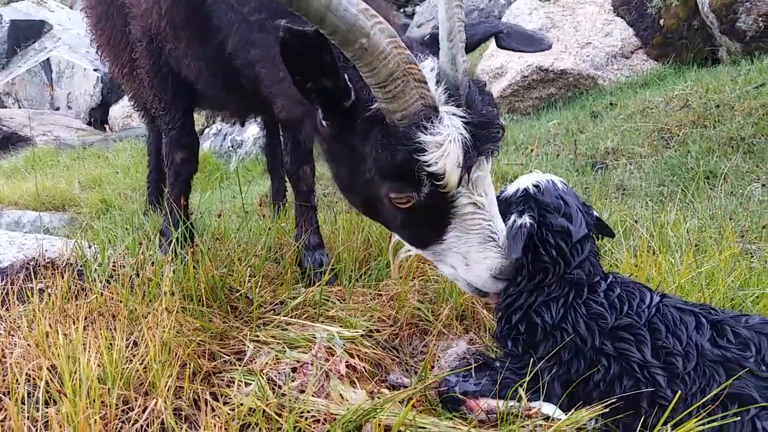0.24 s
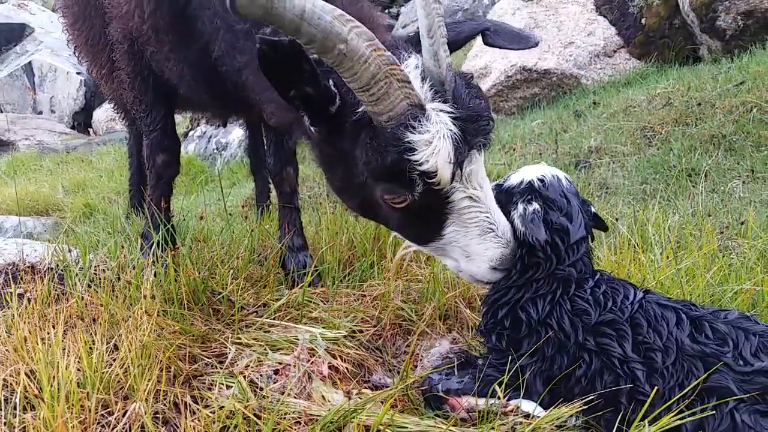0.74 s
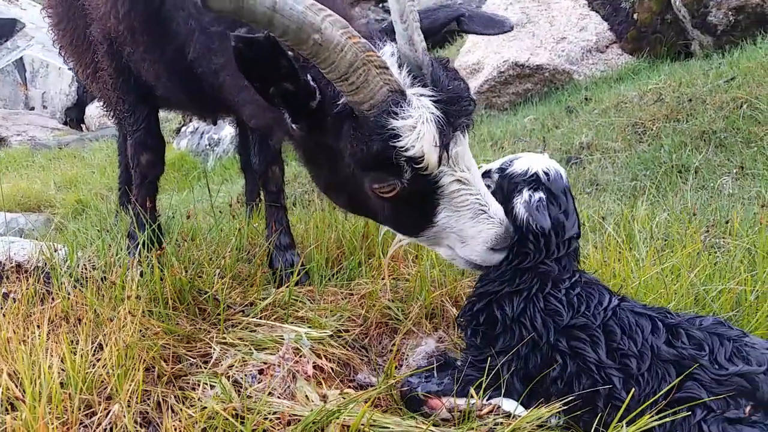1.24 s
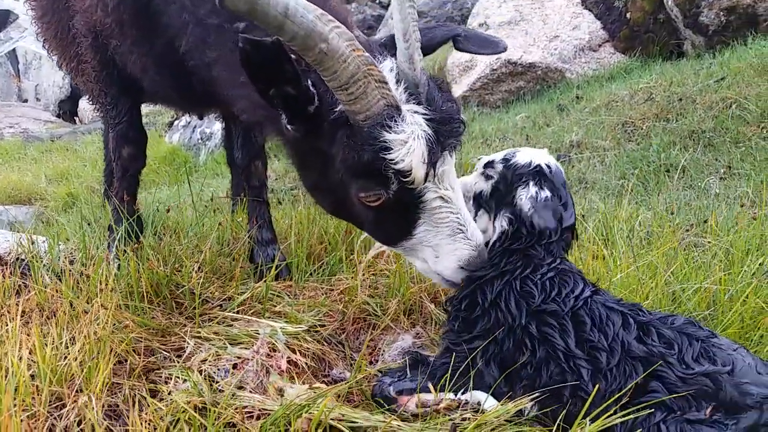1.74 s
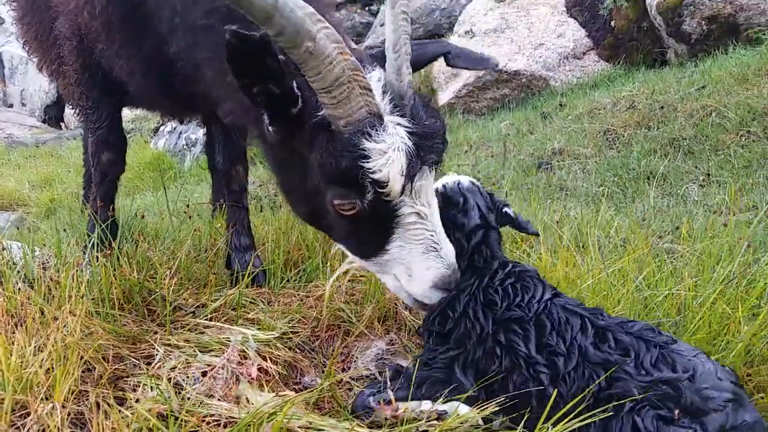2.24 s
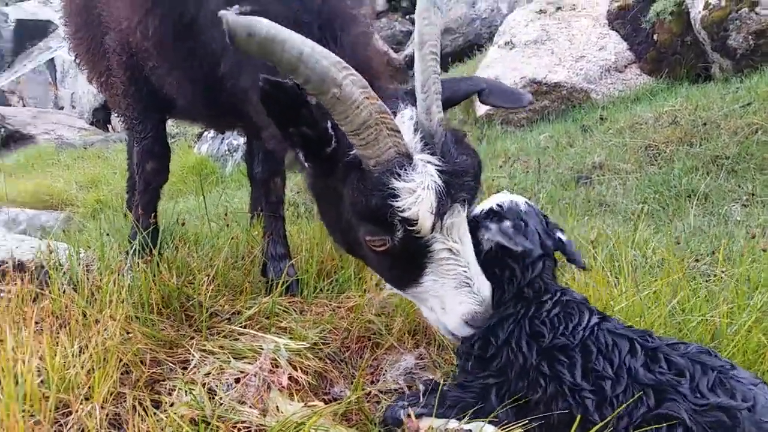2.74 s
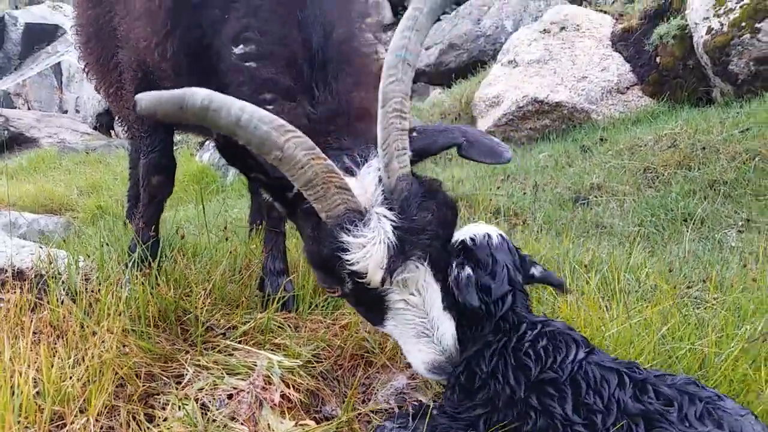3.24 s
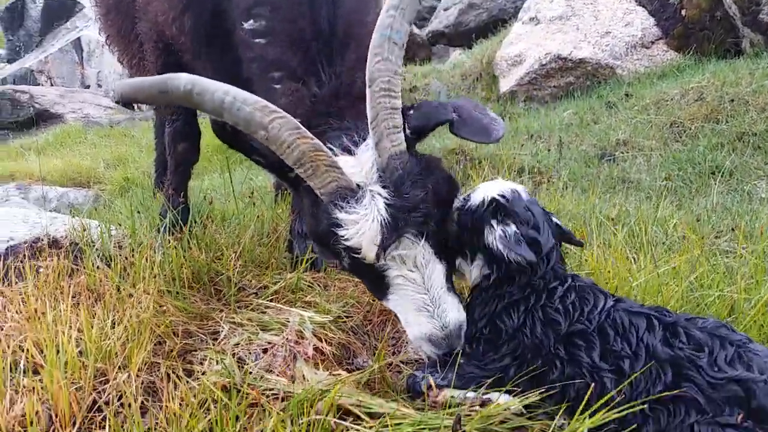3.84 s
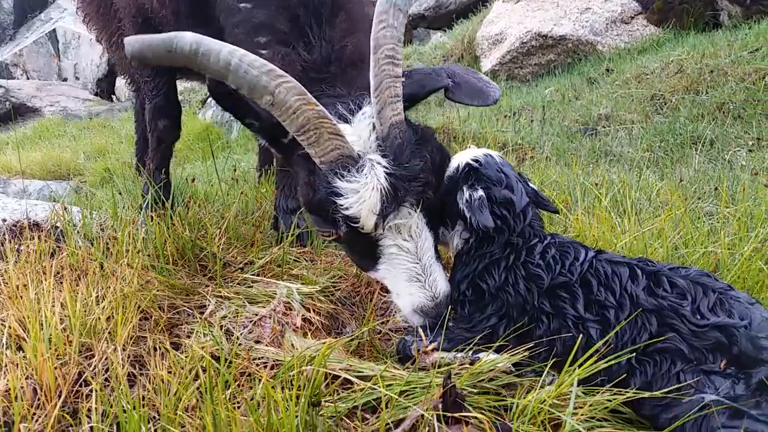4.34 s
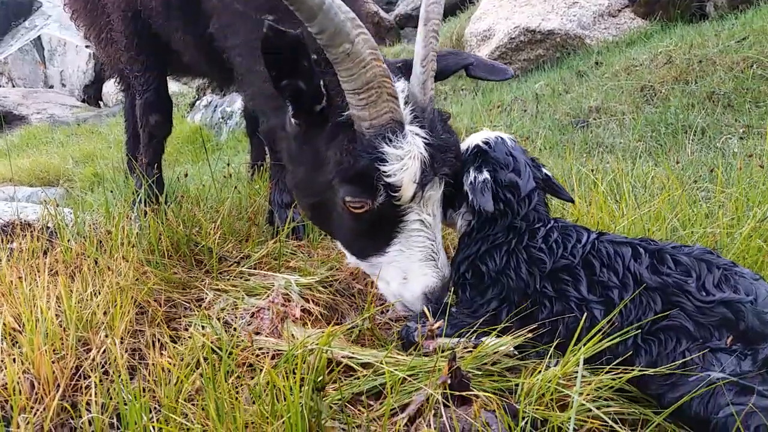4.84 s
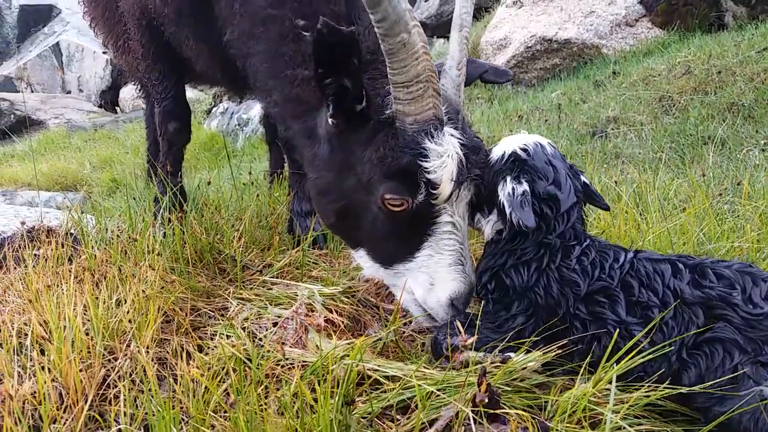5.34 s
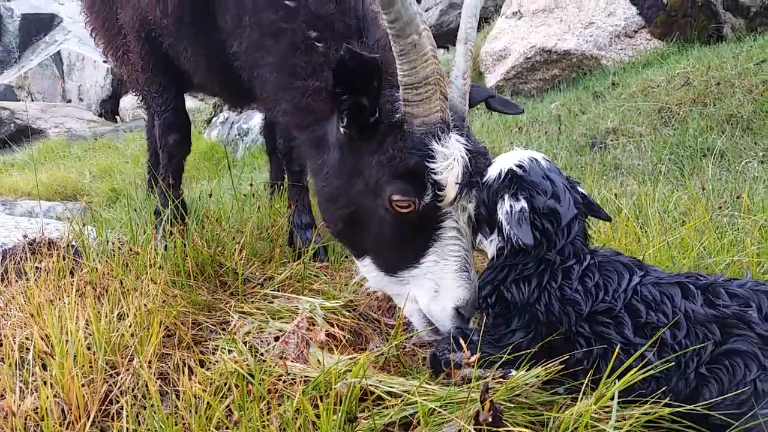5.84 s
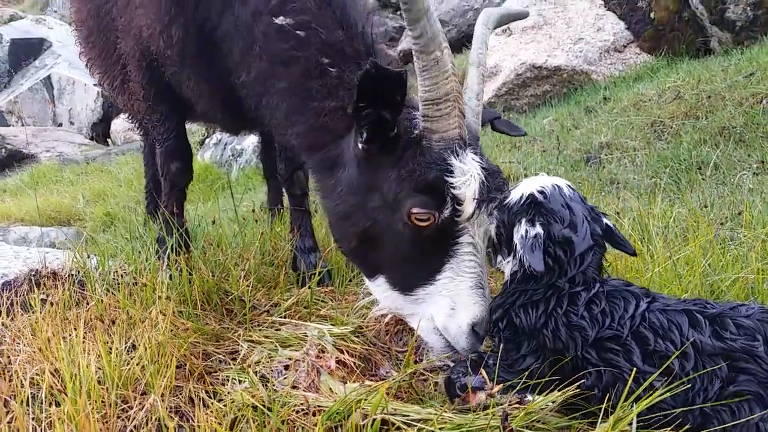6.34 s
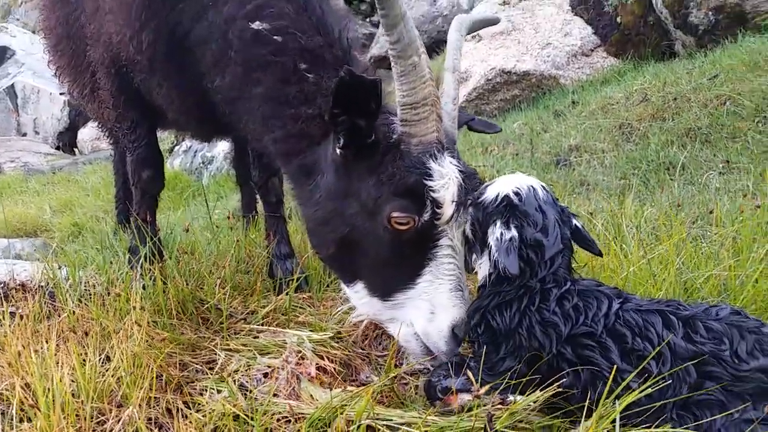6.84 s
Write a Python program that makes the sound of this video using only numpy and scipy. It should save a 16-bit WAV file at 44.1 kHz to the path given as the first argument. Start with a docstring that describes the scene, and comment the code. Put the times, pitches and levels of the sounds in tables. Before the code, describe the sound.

Short closed-mouth goat grunts, quick wet tongue licks, and two thin trembling kid bleats, the last cut off at its loudest, on a quiet grassy slope.

```python
"""On a grassy slope a newborn goat kid bleats twice, right of the microphone, while its mother licks it. The
kid's voice is a sum of overtones of a moving pitch, weighted by mouth and throat resonances. The mother answers
in short nasal grunts: a nearly pure hum with pulses that ring the nose. Licks and ticks are damped rings,
rubbed fur and the mother's breaths are shaped noise with crackle. Another goat bleats far off as pulses through
a distant throat; shaped noise gives the distant water and wind that hum under it all."""
import sys
import numpy as np
from scipy import signal
from scipy.fft import rfft, irfft, next_fast_len
from scipy.io import wavfile
from scipy.ndimage import uniform_filter1d, map_coordinates

SR = 44100
rng = np.random.default_rng(int(sys.argv[2]) if len(sys.argv) > 2 else 0)


def digitize_waveform(pressure):
    """Quantize a signal to 16-bit integers and store it at the path in sys.argv[1].

    Rows of a 2-D input are taken as channels; values are limited to [-1, 1].
    """
    field = np.atleast_2d(pressure).T
    bounded = np.clip(field, -1, 1)
    quanta = np.round(bounded * 32767).astype(np.int16)
    wavfile.write(sys.argv[1], SR, quanta)


N = 311787

# levels are relative: each source applies its own gains to them

# course of the air noise: t/s, rumble level/dB, rush level/dB
AIR_COURSE = [(0.0, -49.5, -58), (0.75, -51, -59.5), (1.45, -47, -56), (1.93, -47, -51.5),
              (2.09, -50.5, -56.5), (2.8, -51, -57.5), (3.7, -52, -61.5), (4.0, -48, -60),
              (4.35, -52.5, -61.5), (5.14, -48, -60), (5.5, -51, -60.5), (5.82, -47.5, -55),
              (6.3, -52, -60.5), (7.07, -45.5, -55)]
# spectra of the low rumble and the far rush: f/Hz, density level/dB
RUMBLE_SPECTRUM = [(12, -58.5), (20, -30), (27, -17.5), (102, 0.5), (149, -6), (182, -15), (260, -22.5),
                   (340, -37.5), (570, -120)]
RUSH_SPECTRUM = [(120, -25.5), (200, -5), (328, -5), (353, -5), (423, -6.5), (599, -14.5), (964, -20.5),
                 (1060, -22.5), (1670, -23.5), (3460, -40.5), (8030, -62.5), (10600, -55), (15800, -45)]
# likeness of left and right in diffuse noise: f/Hz, correlation (1 alike, -1 opposed)
LIKENESS = [(60, 0.94), (180, 0.92), (550, 0.73), (1650, -0.39), (4970, -0.51), (15000, 0.05)]

# bright ticks of wet hair parting: t/s, level/dB, f/Hz, left minus right/dB
HAIR_TICKS = [(0.0782, -64.5, 7500, 2), (0.3227, -57, 7500, -7), (0.836, -73, 4400, -17),
              (1.3997, -36, 6770, -7.5), (2.0785, -57, 6460, -9), (2.0949, -52, 7560, -9.0),
              (2.8457, -62, 6510, -26), (3.027, -54.5, 6550, -9), (3.041, -61.5, 6400, -19),
              (3.066, -64, 6580, -10.5), (3.1448, -40, 7230, -13), (3.262, -72, 5640, 0),
              (3.2897, -56.5, 7960, -5.5), (3.6754, -71, 8280, 4), (4.6248, -58, 7220, -9),
              (4.8858, -59, 8100, 4), (5.1342, -69, 4440, -4), (5.3281, -56, 6450, 1),
              (6.2068, -66.5, 7550, 3), (6.574, -56, 6000, -12)]
# tongue on wet fur: t/s, level/dB, f/Hz
TONGUE_LICKS = [(0.2159, -57, 1520), (0.2382, -41, 1690), (0.3363, -44, 1600), (0.8366, -40.5, 1650),
                (0.9306, -55, 1560), (1.003, -38.5, 1750), (1.073, -53, 1680), (1.1554, -35.5, 1770),
                (1.2466, -36, 1870), (1.3, -51, 1650), (1.3314, -41, 2410), (1.3668, -35, 1617),
                (1.3756, -32.5, 1930), (1.4676, -32.5, 1780), (1.505, -33, 1854), (1.5705, -32, 1630),
                (1.6202, -41, 1900), (1.6775, -34, 1816), (1.7356, -38.5, 1960), (1.7865, -35, 1664),
                (1.8637, -32.5, 1904), (2.0286, -38, 1830), (2.0574, -54.5, 1750), (2.0806, -48, 1840),
                (2.1514, -39, 1890), (2.172, -42.5, 1870), (2.2384, -43.5, 1870), (2.259, -45, 1590),
                (2.3411, -37, 1650), (2.4481, -42, 1803), (2.5164, -43, 1680), (2.6, -49.5, 1720),
                (2.645, -51.5, 1690), (2.7542, -42, 1870), (2.8465, -49.5, 1830), (2.9441, -47, 1820),
                (4.063, -52, 1500), (4.8928, -56.5, 1400)]
# rubs over fur and grass, and the mother's breaths with her grunts (0.33, 0.494, 5.834, 5.95 s): # t/s, scratch
# level/dB, its fade/(dB/s), hiss level/dB, its fade/(dB/s)
RUBS_AND_BREATHS = [(0.33, -70.5, 33, -85.5, 196), (0.494, -73.5, 62, -81.5, 55), (0.832, -83, 60, -92.5, 100),
                    (1.968, -59.5, 18.5, -64, 106), (2.3, -63, 19, -85.5, 13), (2.577, -79.5, 28.5, -73.5, 250),
                    (3.115, -64.5, 57, -68.5, 98.5), (3.15, -62.5, 92, -57.5, 188.5),
                    (3.21, -86, 85.5, -67, 298.5), (3.47, -89, 48.5, -81.5, 197.5), (5.72, -75.5, 53, -87, 16),
                    (5.834, -68, 398, -67, 602.5), (5.95, -67.5, 83.5, -63, 391.5),
                    (5.885, -74, 200, -72.5, 300), (6.53, -93, 20, -79.5, 60)]
# spectra of the scratch and of the hiss: f/Hz, density level/dB
SCRATCH_SPECTRUM = [(710, -38.5), (1200, -3), (1310, -5.5), (1640, 1), (1900, 1.5), (3700, -15.5),
                    (6840, -16), (7850, -14), (9500, -41), (12400, -65), (20900, -120)]
HISS_SPECTRUM = [(4000, -30), (7300, -2), (8600, -8), (10300, -13), (12500, -6), (15000, 0), (15800, -3)]
STROKE_DB_PER_S = 500  # how fast a rub or breath sets in

# the mother's grunts: peak t/s, swell/s, fade/s, pitch f/Hz at start, at peak, at end, hum level/dB,
# overtone level/dB, opening rasp level/dB, closing rasp level/dB, closing ring f/Hz, top rasp level/dB
MOTHER_GRUNTS = [(0.34, .022, .026, 176.3, 170, 160.8, -35, -50.5, -80, -78, 4850, -72),
                 (0.392, .028, .03, 160.2, 197.6, 190, -30, -52, -69, -59, 5300, -79),
                 (0.494, 0.056, 0.039, 180.5, 226.1, 182.8, -22, -40.5, -52, -43.5, 4640, -57),
                 (2.217, 0.011, 0.024, 170.3, 162.6, 156.4, -36, -56, -77, -68, 5200, -79),
                 (2.263, 0.025, 0.029, 164.1, 197.8, 199, -30.5, -48, -71, -50, 5500, -65),
                 (2.378, 0.059, 0.039, 172.1, 207.5, 185, -26.5, -43.5, -71, -50, 4680, -75),
                 (3.18, 0.1, 0.061, 222.8, 196.3, 148, -44, -54, -74, -70, 5100, -59),
                 (5.672, .016, .045, 186.8, 193.7, 203.4, -32, -57, -83, -74, 4450, -84),
                 (5.715, .018, .028, 206.9, 212, 199.5, -27, -57, -69, -69, 5680, -77),
                 (5.81, 0.04, .045, 194.8, 236.3, 179.4, -22.5, -48, -54, -43, 4940, -48.5),
                 (5.934, .056, .04, 200.4, 256.2, 184, -19.5, -43, -46, -41, 4710, -48)]
# course of every grunt: share of the swell (negative) or of the fade, then what is added to the
# hum level/dB, overtone level/dB, rasp level/dB
GRUNT_COURSE = [(-1, -37, -29.5, -20.5), (-.75, -18.5, -5, -1.5), (-0.54, -7, -8, -17.5),
                (-.2, -5, -4, -10.5), (0.19, 2, 0.5, -17.5), (0.33, -13.5, -1, -2), (1, -44.5, -15.5, -22)]
# resonances of the nose and of the rasp: f/Hz, width/Hz, level/dB
NOSE_MODES = [(600, 686, 9.5), (1120, 388, 12), (2030, 710, 2)]
RASP_MODES = [(4200, 400, 2), (5660, 500, 6), (7540, 480, -4), (13360, 1100, -8.5)]
# single flaps of the slack folds: t/s, level/dB
FOLD_FLAPS = [(5.735, -42), (5.7695, -48.5), (5.864, -52.5), (5.9815, -46), (5.997, -49), (6.0124, -56.5)]
OPEN_RING_HZ, OPEN_TOP_DB = 5400, -12.5  # opening rasp: its ring, and its top relative to its own level
JOIN_S = .006  # grunts closer than this run into each other without a silence

# the kid's bleats: t/s, pitch f/Hz, low mouth resonance f/Hz, its level/dB, high mouth resonance f/Hz,
# its level/dB, treble level/dB, brightest treble f/Hz
FIRST_BLEAT = [(0.95, 520, 1250, -94, 2000, -93, -92, 6400), (0.995, 571, 1250, -61, 2000, -63, -73, 6000),
               (1.03, 599, 1250, -64, 2000, -61, -70.5, 5950),
               (1.09, 613.7, 1250, -60, 2000, -54, -69, 6600),
               (1.135, 617, 1250, -57, 2120, -60.5, -60.5, 6000),
               (1.16, 615, 1240, -57, 2000, -51, -60, 5600), (1.22, 605, 1240, -57, 2000, -53, -59.5, 5900),
               (1.255, 607, 1250, -51.5, 1911, -54.5, -59.5, 5570),
               (1.28, 613, 1250, -44, 1910, -46.5, -54.5, 4300),
               (1.335, 605, 1240, -54, 2040, -52.5, -59, 4700),
               (1.365, 608, 1260, -48, 2160, -51.5, -55, 6400),
               (1.42, 622.5, 1250, -45, 2240, -51.5, -49, 5810),
               (1.51, 625.5, 1238, -45, 2020, -53, -45, 7350), (1.55, 629, 1248, -45, 2297, -51, -43, 4450),
               (1.6, 643.6, 1269, -43, 2660, -46.5, -38.5, 4480),
               (1.654, 652.7, 1290, -39, 2662, -45.5, -38.5, 4520),
               (1.76, 644.2, 1275, -43, 2820, -47.5, -36, 4913),
               (1.8, 636, 1270, -42, 2430, -44, -36, 6270), (1.845, 634, 1268, -39, 2400, -47, -40, 4370),
               (1.89, 634, 1277, -37, 2270, -49, -34.5, 6310),
               (1.925, 621, 1212, -36, 2294, -52, -37.5, 6000),
               (1.948, 550, 1768, -27.5, 2300, -55, -32, 3796),
               (1.962, 510, 1600, -50.5, 2300, -64, -56.5, 4040)]
SECOND_BLEAT = [(6.36, 424.5, 1500, -79, 2700, -88, -120, 5400),
                (6.41, 418.8, 1700, -80, 2710, -72, -110, 5400),
                (6.45, 503.4, 1880, -60, 2870, -64.5, -100, 5400),
                (6.5, 557, 1640, -54.5, 2890, -58, -92, 5500),
                (6.565, 583.4, 1730, -52, 3000, -53.5, -86, 5600),
                (6.58, 596.8, 1500, -36, 2560, -59, -94, 5900),
                (6.595, 595.4, 1760, -43, 2540, -42, -90, 6000),
                (6.612, 604, 1670, -35, 2620, -36.5, -82, 6200),
                (6.626, 595.5, 1800, -36.5, 2400, -41, -95, 5900),
                (6.642, 579.4, 1740, -40.5, 2900, -59, -88, 5300),
                (6.7, 591, 1740, -44.5, 2750, -58, -83, 5500),
                (6.706, 588.2, 1730, -33, 2570, -35.5, -100, 6000),
                (6.735, 604.3, 1710, -32.5, 2570, -32, -81, 6800),
                (6.765, 614.5, 1570, -29, 2550, -31, -62.5, 4400),
                (6.8, 628.7, 1570, -27, 2650, -35, -53, 4450),
                (6.826, 640.8, 1545, -26, 2650, -35, -53.5, 4470),
                (6.833, 637.2, 1820, -25, 2770, -33, -44, 7700),
                (6.87, 646, 2000, -21, 2760, -33, -40, 7260),
                (6.92, 639.5, 1990, -22, 2870, -31, -38.5, 7140),
                (6.95, 630.7, 1910, -24.5, 2850, -29.5, -38.5, 6500),
                (6.98, 622.6, 1880, -26.5, 2780, -29.5, -35.5, 6680),
                (7.02, 619.3, 1865, -26.5, 2780, -29.5, -38, 6150),
                (7.07, 616.3, 1790, -27, 2720, -29, -38.5, 5770)]
# throat resonances: f/Hz, width/Hz, level relative to the treble/dB in the first bleat, in the second,
# level added while the first is still quiet/dB
THROAT_MODES = [(3800, 400, -8, -22, -6), (4450, 620, 0, 0, -12), (5450, 890, -10, -1, 10),
                (6400, 770, 0, 0, 1), (7600, 750, -2, 0, -6), (9900, 1100, -45, -24, 20)]
# overtones above the throat: f/Hz, level relative to the second highest throat resonance/dB
SHEEN_SPECTRUM = [(8500, -18.5), (9100, -15.5), (9700, -47.5), (10500, -52), (11200, -21.5), (13000, -35.5),
                  (15500, -36.5)]
# stereo level of each bleat: f/Hz, left minus right/dB
FIRST_PAN = [(600, 0.5), (2500, -0.5), (3300, -12.5), (6400, -15), (7800, -7), (8600, 11.5), (15000, 1)]
SECOND_PAN = [(600, -0.5), (1250, 5), (2000, -1.5), (4000, -3.5), (5500, -14.5), (7500, -9.5), (8600, 8),
              (15000, 1.5)]
# stereo phase of each bleat: f/Hz, lead of the left/rad
FIRST_PHASE = [(0, 2.5), (2500, -1.2), (3010, -1.5), (3700, 2.3), (4910, -3.1), (6290, 0.7), (6800, -6.5),
               (8270, 3.5), (9390, 10), (11200, 2), (11500, 5.5), (13000, 4), (15400, 18.5), (16000, 11)]
SECOND_PHASE = [(0, -6), (4050, 1.5), (5250, -0.5), (6290, -4), (6890, 3), (7320, -8), (7840, -7),
                (8960, -31), (10200, -17), (10500, -15.5), (11100, -11), (14400, -17.5), (15000, -15.5),
                (16000, -11.5)]
# the voice trembles as it starts: t/s, pitch drop before smoothing/Hz, half length/s
PITCH_SAGS = [(1.068, 124.7, 0.061), (1.187, 124.3, 0.047), (1.308, 74.6, .05)]
SAG_DB_PER_HZ = 0.27  # the mouth resonances fade as the pitch drops
MOUTH_LOW_HZ, MOUTH_HIGH_HZ, UPPER_HZ, BRIGHT_HZ = 266, 700, 487, 624  # widths of moving or added resonances
QUIET_DB, OPEN_DB = -59.5, -51  # treble levels between which the colour of the first bleat changes
CHEST_DB, CHEST_GROWS = -35.5, 0.51  # floor of the second overtone, and its growth per dB of the low resonance

# the far goat's throbs: t/s of the abrupt end, level/dB, pitch f/Hz
FAR_THROBS = [(4.985, -80.5, 490), (5.09, -70.5, 482), (5.19, -66, 503), (5.289, -61.5, 525),
              (5.39, -58, 497), (5.499, -61.5, 494), (5.598, -65.5, 477), (5.69, -67.5, 462)]
# its throat resonances: f/Hz, width/Hz, level/dB
FAR_MODES = [(1500, 400, -16), (2030, 260, -1), (2817, 350, -7.5), (3980, 900, -6), (5740, 550, -14.5),
             (6580, 595, -12), (7960, 1100, -22.5)]

TOP_HZ = 15830  # band limit of the whole sound


def amp(db):
    """Level definition: amplitude ratio of a level in dB."""
    return 10 ** (np.asarray(db) / 20)


def unit(x):
    """Normalisation to an rms of 1."""
    return x / np.sqrt(np.mean(x ** 2) + 1e-20)


def along(points, hz):
    """Interpolation of (f/Hz, value) points on a logarithmic frequency axis."""
    f, v = np.transpose(points)
    return np.interp(np.log(hz + 1), np.log(f + 1), v)


def played(rows):
    """Linear interpolation in time: the samples the rows span, and every column read on them."""
    s, *columns = np.asarray(rows, float).T
    s = np.maximum.accumulate(s)
    at = np.arange(max(round(s[0] * SR), 0), min(round(s[-1] * SR), N))
    return at, [np.interp(at / SR, s, column) for column in columns]


def wobble(rate, size):
    """Band-limited fluctuation: a smooth random curve with rate knots a second."""
    return map_coordinates(rng.standard_normal(int(size * rate / SR) + 4), [np.arange(size) * rate / SR])


def edges(size, fade):
    """Linear envelope that fades in and out over fade seconds."""
    i = np.arange(size)
    return np.clip(np.minimum(i, size - i) / (fade * SR), 0, 1)


def filtered(x, response):
    """Convolution theorem: the spectrum of x times a complex response of frequency."""
    m = next_fast_len(x.shape[-1] + 8192)
    spectrum = rfft(x, m) * response(np.fft.rfftfreq(m, 1 / SR))
    return irfft(spectrum, m)[..., :x.shape[-1]]


def cavity(modes):
    """Modal superposition: causal damped resonances (f/Hz, width/Hz, level/dB) of alternating sign."""
    def mode(f, centre, width, db):
        return amp(db) * 1j * f * width / (centre * centre - f * f + 1j * f * width)
    return lambda f: sum((-1) ** k * mode(f, *row) for k, row in enumerate(modes))


def cavity_twice(x, modes):
    """Cascaded resonance: the signal passes the same cavity twice."""
    return filtered(x, lambda f: cavity(modes)(f) ** 2)


def resonance(f, centre, width, order):
    """Power resonance curve: falls to one half at half the width from its centre."""
    return 1 / (1 + abs(2 * (f - centre) / width) ** order)


def hush(spectrum, patchy_db):
    """Partial coherence: shaped stereo noise mixed from mid and side, with patches of random gain."""
    z = signal.stft(rng.standard_normal((2, N)), nperseg=512)[2]
    patches = uniform_filter1d(rng.standard_normal(z.shape[1:]), 6, 0)
    patches = uniform_filter1d(patches, 10, 1)
    pair = signal.istft(z * amp(patchy_db * unit(patches)), nperseg=512)[1][:, :N]

    def shape(hz):
        turn = np.arccos(np.clip(along(LIKENESS, hz), -1, 1)) / 2
        return amp(along(spectrum, hz)) * [np.cos(turn), np.sin(turn)]

    mid, side = filtered(pair, shape)
    return np.array([mid + side, mid - side]) / np.std(mid)


def clicks(rows, cycles, crack, rise):
    """Damped oscillation: short rings with a noisy crack; rows (t/s, level/dB, f/Hz, left minus right/dB)."""
    out, t = np.zeros((2, N + 400)), np.arange(400) / SR
    for s, db, hz, pan_db in rows:
        ring = np.sin(2 * np.pi * hz * t) * np.exp(-t * hz / cycles) * (1 - np.exp(-t / rise))
        noise = np.diff(rng.standard_normal((2, len(t) + 1))).mean(0)
        ring += crack * noise * np.exp(-t / 0.00069)
        out[:, round(s * SR):][:, :len(t)] += amp(db + 9.0) * ring * amp([[pan_db / 2], [-pan_db / 2]])
    return out[:, :N]


def echo(x, t60):
    """Diffuse reflection by the slope: exponentially decaying noise, drawn anew for each channel."""
    tail = rng.standard_normal((2, SR // 4)) * amp(-60 * np.arange(SR // 4) / SR / t60)
    tail /= np.linalg.norm(tail[0])  # unit energy on the left
    return signal.fftconvolve(x[None], tail, axes=1)[:, :N]


def air():
    """Broadband noise: a low rumble and a soft far rush, both a little louder on the left."""
    at, (rumble_db, rush_db) = played(AIR_COURSE)
    out = np.zeros((2, N))
    rumble_gain = amp(rumble_db + 1.2 * wobble(4, size=len(at)))
    out[:, at] = rumble_gain * hush(RUMBLE_SPECTRUM, patchy_db=.3)[:, at]
    out[:, at] += amp(rush_db + 3) * hush(RUSH_SPECTRUM, patchy_db=2.0)[:, at]
    return out * amp([[1.2], [-1.2]])


def hair_ticks():
    """Impulsive excitation: parting wet hair gives bright, strongly damped rings."""
    return clicks(HAIR_TICKS, cycles=1.94, crack=0.026, rise=.0001)


def licks():
    """Superposed damped resonances: four rings for each touch of the tongue."""
    rows = TONGUE_LICKS
    out = clicks([(s, db, hz, 1) for s, db, hz in rows], cycles=1.4, crack=0, rise=.00028)
    # the gap under the tongue rings twice
    out += clicks([(s, db - 16.0, 1.3 * hz, 0) for s, db, hz in rows], cycles=2.4, crack=0, rise=0.00015)
    # the soft push behind it
    out += clicks([(s, db - 8, 0.38 * hz, 2) for s, db, hz in rows], cycles=1.0, crack=0, rise=0.00042)
    # the film of water snaps
    out += clicks([(s, db - 23, 4.2 * hz, -4) for s, db, hz in rows], cycles=3.5, crack=.02, rise=.0001)
    return out


def strokes(rows):
    """Exponential decay: power sum of strokes (t/s, level/dB, fade/(dB/s)) with a steep onset."""
    t = np.arange(N) / SR

    def power(s, db, fade):
        return amp(db - np.where(t < s, STROKE_DB_PER_S * (s - t), fade * (t - s))) ** 2

    return np.sqrt(sum(power(*row) for row in rows))


def rubs_and_breaths():
    """Friction noise: fur hisses and crackles with random grains as it is rubbed, and the mother's breaths with
    her grunts hiss through the same shapes."""
    rows = np.array(RUBS_AND_BREATHS)
    scratch, hiss = strokes(rows[:, [0, 1, 2]]), strokes(rows[:, [0, 3, 4]])
    chance = rng.random((2200, 4))
    grains = [(a * (N - 1) / SR, 9 * b, 4300 * amp(5 * c), 8 * (d - .9)) for a, b, c, d in chance]
    crackle = clicks(grains, cycles=2.2, crack=0, rise=.0004)
    rubbing = hush(SCRATCH_SPECTRUM, patchy_db=2) + .42 * unit(crackle)
    return 0.91 * scratch * rubbing + 1.3 * hiss * hush(HISS_SPECTRUM, patchy_db=6.0)


def grunt(s, swell, fade, start_hz, peak_hz, end_hz, hum_db, tones_db, open_db, close_db, ring_hz, top_db):
    """Envelope of one grunt: rows (t, pitch, hum, overtones, rasp, ring, top), rasp at opening and closing."""
    u, hum, tones, rasp = np.transpose(GRUNT_COURSE)
    early = u < 0
    time = s + u * np.where(early, swell, fade)
    pitch = peak_hz + abs(u) ** 1.1 * np.where(early, start_hz - peak_hz, end_hz - peak_hz)
    rasp_db = np.where(early, open_db, close_db) + rasp
    rasp_hz = np.where(early, OPEN_RING_HZ, ring_hz)
    top = np.where(early, open_db + OPEN_TOP_DB, top_db) + rasp
    return np.transpose([time, pitch, hum_db + hum, tones_db + tones, rasp_db, rasp_hz, top])


def joined_grunts():
    """Continuity of phonation: grunts that nearly touch become one course."""
    grunts = [grunt(*row) for row in MOTHER_GRUNTS]
    for i in range(len(grunts) - 1, 0, -1):
        if grunts[i][0, 0] - grunts[i - 1][-1, 0] < JOIN_S:
            grunts[i - 1:i + 1] = [np.vstack([grunts[i - 1][:-1], grunts[i][1:]])]
    return grunts


def mother():
    """Source-filter principle: a near pure closed-mouth hum, nasal overtones and a small rasp each cycle."""
    grunts = joined_grunts()
    at, (hz, hum_db, tones_db, rasp_db, rasp_hz, top_db) = played(np.vstack(grunts))
    on = np.zeros(N)
    for rows in grunts:
        on[played(rows)[0]] = 1
    on = uniform_filter1d(on, round(0.0052 * SR))[at]  # silent between the grunts
    cycles = np.cumsum(hz * (1 + 0.017 * wobble(130, size=len(at)))) / SR
    closure = cycles + 1 / 4  # the folds slap shut in the trough of the hum
    pulses = np.diff(np.floor(closure), prepend=0) * amp(1.8 * rng.standard_normal(len(at)))
    puffs = unit(np.exp(-4 * (closure % 1)) * rng.standard_normal(len(at)))  # air escapes after each closure
    pure = np.sqrt(2) * (np.sin(2 * np.pi * cycles) + 0.0084 * np.cos(4 * np.pi * cycles))
    voice = uniform_filter1d(amp(hum_db), round(.016 * SR)) * pure
    voice += amp(tones_db) * unit(cavity_twice(.45 * puffs - unit(pulses), NOSE_MODES))
    voice += amp(top_db) * unit(cavity_twice(.3 * puffs + unit(pulses), RASP_MODES[2:]))
    voice += amp(rasp_db - 5) * unit(cavity_twice(.4 * puffs + unit(pulses), RASP_MODES[:2]))
    # the nostril ring moves from slap to slap
    ring_hz = rasp_hz * amp(.5 * rng.standard_normal(len(at)))
    slaps = [(at[i] / SR, rasp_db[i] + 5.5, ring_hz[i], 0) for i in np.flatnonzero(pulses * on)]
    out = clicks(slaps, cycles=6.9, crack=0, rise=0.00086)[0]
    out[at] += on * voice
    flaps = np.zeros(N)
    for s, db in FOLD_FLAPS:
        flaps[round(s * SR)] = amp(db + 17.5)
    return (out + cavity_twice(flaps, RASP_MODES)) * amp([[1.3], [-1.3]])


def bleat(rows, colour_db, quiet_db, side, lead, slack_hz, root_db, drift_db, spread, bright_db, nasal_db,
          root_grows, upper_hz, upper_db, sheen_db):
    """Formant principle: each overtone is as loud as the mouth and throat resonances around it."""
    at, (hz, low_hz, low_db, high_hz, high_db, treble_db, bright_hz) = played(rows)
    size = len(at)
    sag = sum(drop_hz * np.clip(1 - abs(at / SR - s) / half, 0, 1) ** 1.5 for s, drop_hz, half in PITCH_SAGS)
    hz = uniform_filter1d(hz, round(0.017 * SR)) - uniform_filter1d(sag, round(0.015 * SR))
    quiet = np.clip((OPEN_DB - treble_db) / (OPEN_DB - QUIET_DB), 0, 1)
    colour_db = np.add(colour_db[:, None], quiet_db[:, None] * quiet)
    low_db, high_db = low_db - SAG_DB_PER_HZ * sag, high_db - SAG_DB_PER_HZ * sag
    # folds that sag in pitch leak air and smear the lines
    breath = np.clip((slack_hz - hz) / 170, .042, 1) ** 2
    jitter = (.0005 + 0.0069 * breath) * wobble(200, size=size)
    phase = 2 * np.pi * np.cumsum(hz * (1 + jitter)) / SR
    sway = wobble(5.0, size=size)  # the path to each channel changes as the head sways
    # the highest resonance sounds faintly while the treble is shut
    nasal = amp(nasal_db) * edges(size, fade=0.12) * quiet

    def overtone_power(k, f):
        if k == 1:  # the weak fundamental lies under every resonance
            return amp(root_db + root_grows * low_db) ** 2
        throat = sum(amp(db) ** 2 * resonance(f, c, w, order=6)
                     for db, (c, w, *_) in zip(colour_db, THROAT_MODES))
        sheen = colour_db[-2] + sheen_db[0] + sheen_db[1] * quiet + along(SHEEN_SPECTRUM, f)
        throat += (f > SHEEN_SPECTRUM[0][0]) * amp(sheen) ** 2
        bright = 1 + amp(bright_db) ** 2 * resonance(f, bright_hz, BRIGHT_HZ, order=4)
        power = throat * amp(treble_db) ** 2 * bright
        low = resonance(f, low_hz, MOUTH_LOW_HZ, order=3) * resonance(f, low_hz, 2900, order=6)
        power += amp(low_db) ** 2 * low
        # a third mouth resonance follows the level of the high one
        upper = amp(upper_db) ** 2 * resonance(f, upper_hz, UPPER_HZ, order=6)
        power += amp(high_db) ** 2 * (resonance(f, high_hz, MOUTH_HIGH_HZ, order=6) + upper)
        power += nasal ** 2 * resonance(f, *THROAT_MODES[-1][:2], order=6)
        return power + (k == 2) * amp(CHEST_DB + CHEST_GROWS * low_db) ** 2

    out = np.zeros((2, N))
    for k in range(1, 27):
        f = k * hz
        leak = np.minimum(breath * (.6 + (k / 12) ** 2), 1)  # high overtones smear first
        smear = np.sqrt(1 - leak) + np.sqrt(leak) * wobble(600, size=size)
        left = amp(along(side, f) + drift_db * wobble(7.4, size=size))  # the moving head shades the far channel
        left = left * np.exp(1j * (along(lead, f) + 0.076 * k * sway))
        flicker = amp(drift_db * (-0.5 + (k / 12) ** 2) * wobble(9, size=size))
        tone = np.sqrt(2 * overtone_power(k, f)) * flicker * smear
        tone = tone * np.exp(1j * (k * phase + spread * k * k))
        balance = 2 / np.maximum(abs(1 + left), .7)  # holds the sum of both channels steady
        out[:, at] += (tone * balance * [left, np.ones(size)]).real
    return out


def kid():
    """Source-filter principle: two bleats of one throat, each with its own colour and stereo image."""
    _, _, first_db, second_db, quiet_db = np.transpose(THROAT_MODES)
    out = bleat(FIRST_BLEAT, first_db, quiet_db, FIRST_PAN, FIRST_PHASE, slack_hz=629, root_db=-44,
                drift_db=-0.5, spread=0.55, bright_db=3, nasal_db=-76.5,
                root_grows=0.24, upper_hz=3120, upper_db=-6, sheen_db=(-.5, 12))
    out += bleat(SECOND_BLEAT, second_db, 0 * quiet_db, SECOND_PAN, SECOND_PHASE, slack_hz=490, root_db=-59.5,
                 drift_db=1.0, spread=.04, bright_db=6, nasal_db=-81.5,
                 root_grows=.03, upper_hz=3470, upper_db=-15.5, sheen_db=(3, -12))
    return out + amp(-14.5) * echo(out.mean(0), t60=0.072)


def far_goat():
    """Pulse excitation of a throat: each throb swells, holds and stops short, smeared by the slope."""
    out, t = np.zeros(N), np.arange(-round(.08 * SR), round(0.025 * SR)) / SR

    def throat(f):
        return np.sqrt(sum(amp(db) ** 2 * resonance(f, c, w, order=4) for c, w, db in FAR_MODES))

    for s, db, hz in FAR_THROBS:
        arch = 1 - 25 * (t + .015) ** 2  # the pitch rises and falls within the throb
        cycles = np.cumsum(hz * (arch + .015 * wobble(300, size=len(t)))) / SR
        pulses = np.diff(np.floor(cycles), prepend=0) * amp(2 * rng.standard_normal(len(t)))
        voice = filtered(unit(pulses) + .8 * rng.standard_normal(len(t)), throat)
        swell = np.where(t < 0, amp(60 * t - 11.6 * (t / 0.083) ** 4), amp(-900 * t))
        out[round(s * SR) + np.round(t * SR).astype(int)] += amp(db) * unit(voice) * swell
    return 0.48 * out + 1.16 * echo(out, t60=0.071)


def scene():
    """Linear superposition of all sources."""
    low = air() + mother()
    low[0] = np.roll(low[0], 2)  # the left channel lies a little further from these sources
    return low + hair_ticks() + licks() + rubs_and_breaths() + kid() + far_goat()


def record(dry):
    """Band limitation: an ideal low-pass keeps nothing from TOP_HZ upward."""
    return filtered(dry, lambda hz: hz < TOP_HZ)


dry = scene()
out = record(dry)
digitize_waveform(out)
```